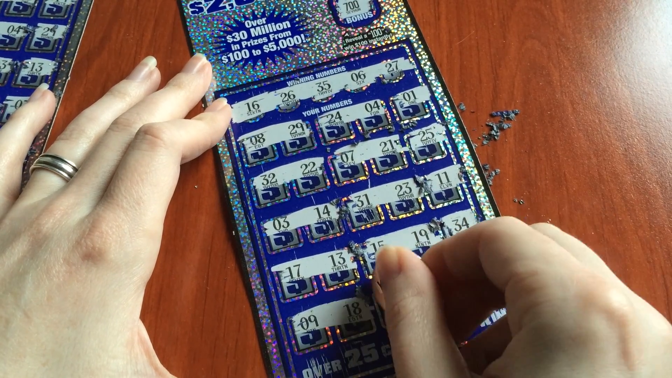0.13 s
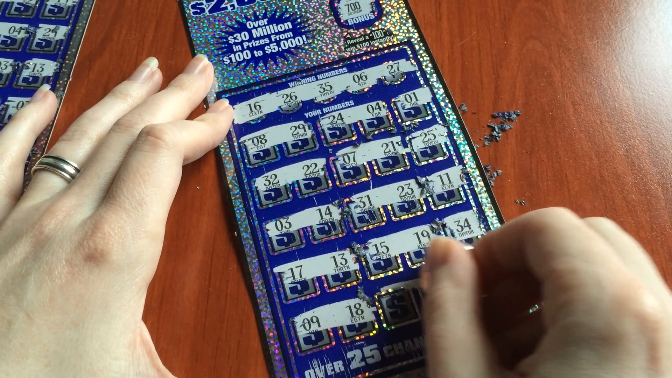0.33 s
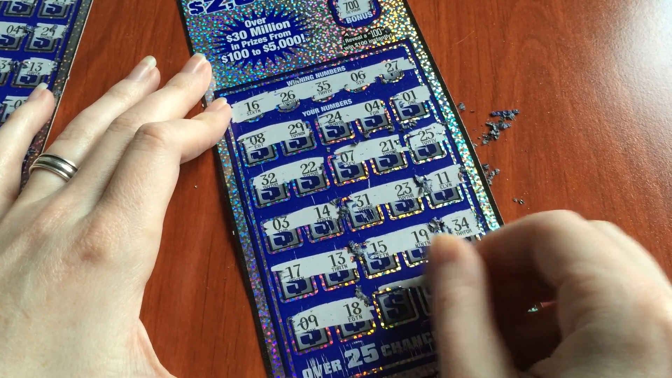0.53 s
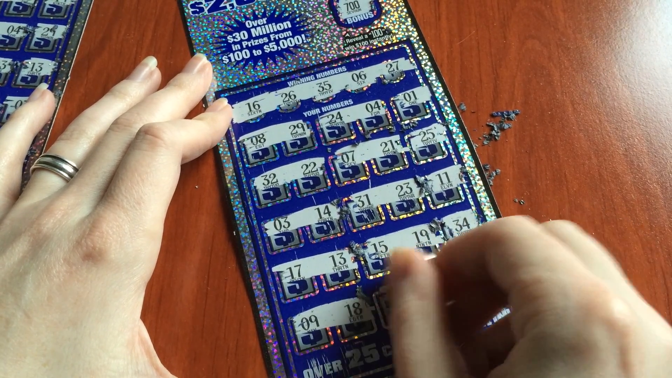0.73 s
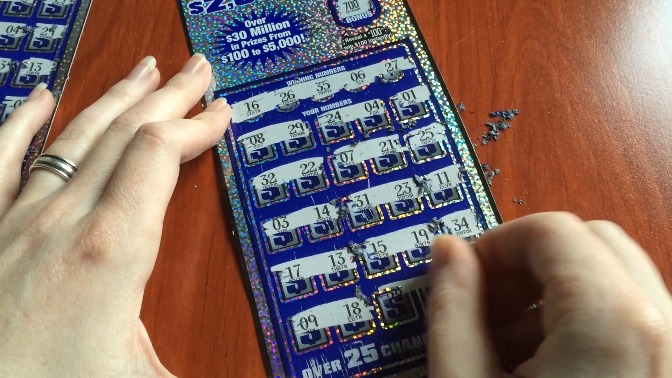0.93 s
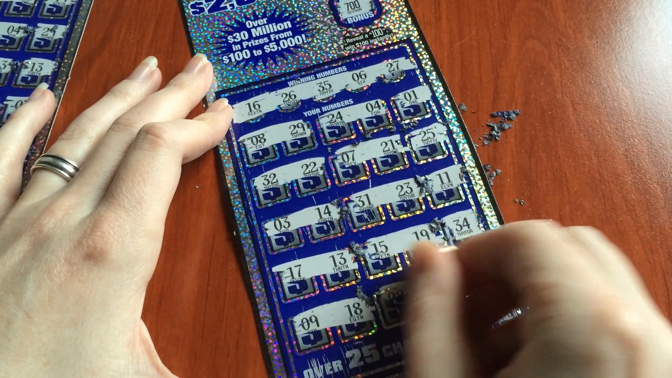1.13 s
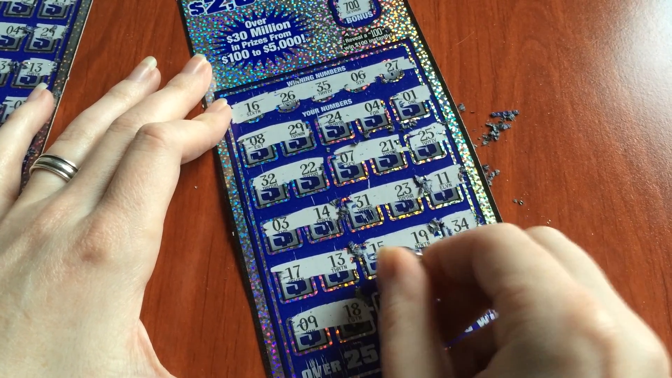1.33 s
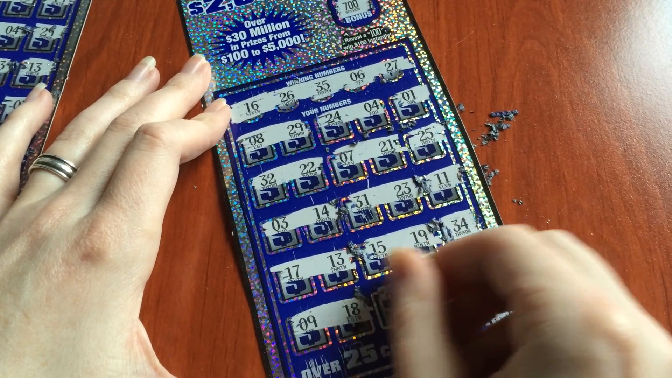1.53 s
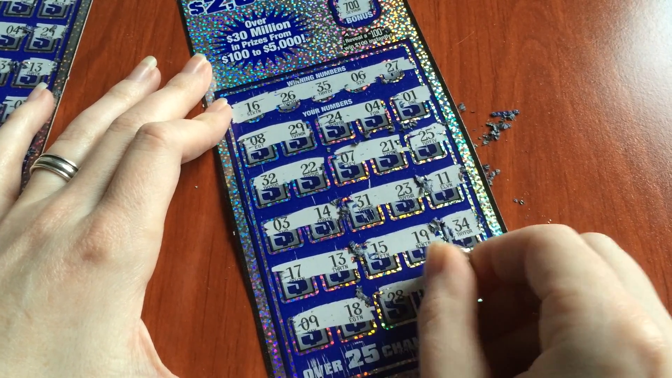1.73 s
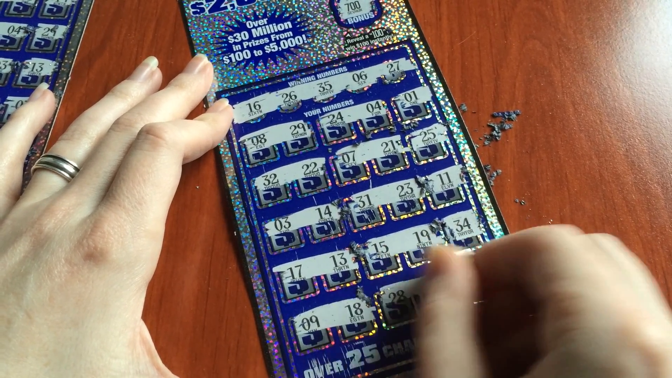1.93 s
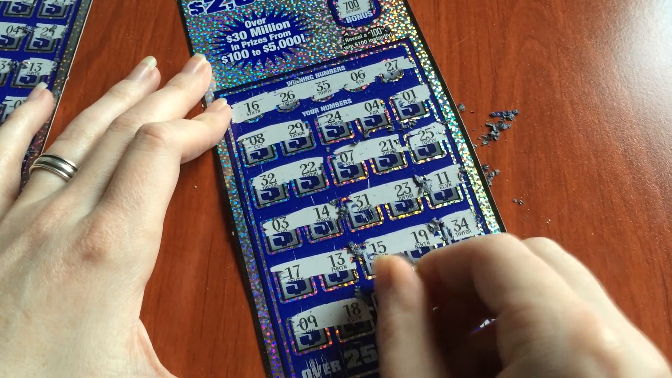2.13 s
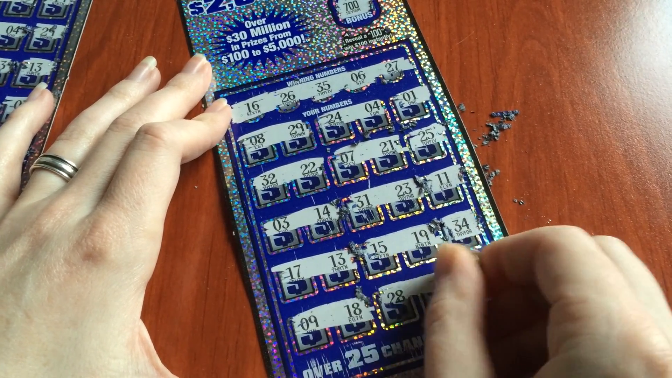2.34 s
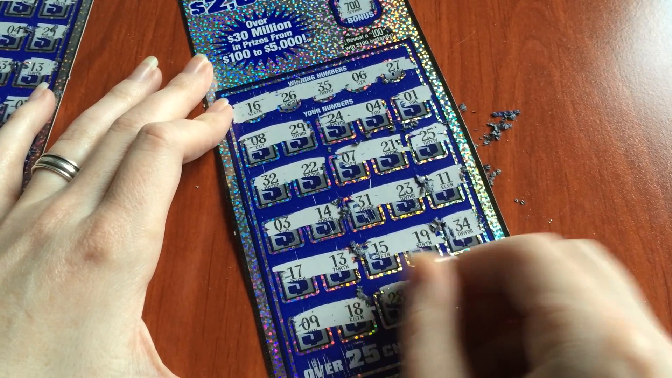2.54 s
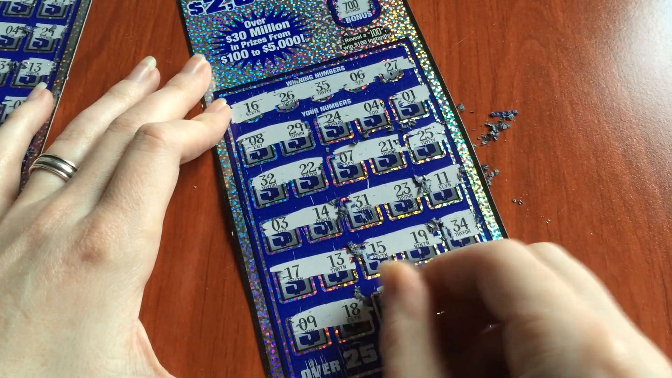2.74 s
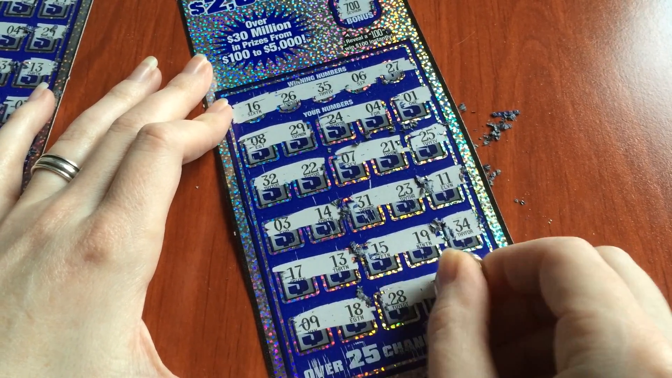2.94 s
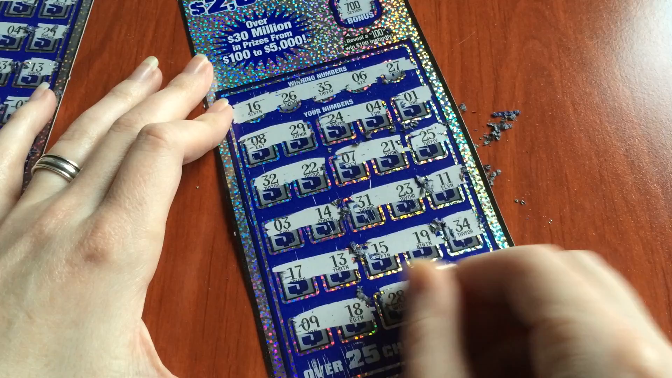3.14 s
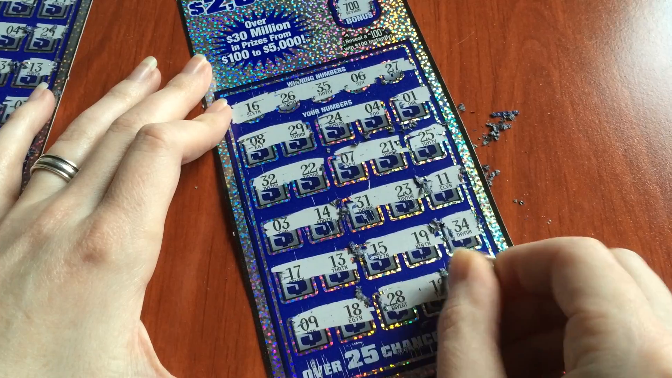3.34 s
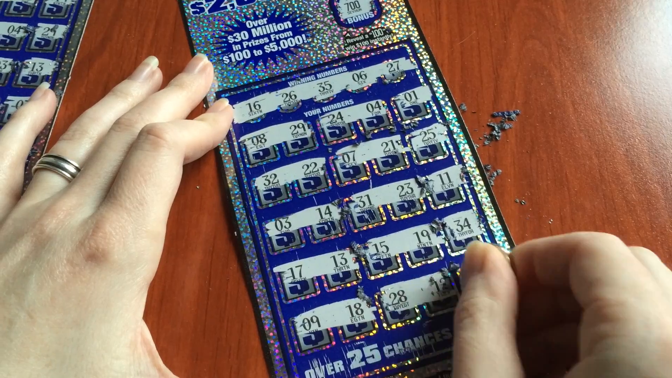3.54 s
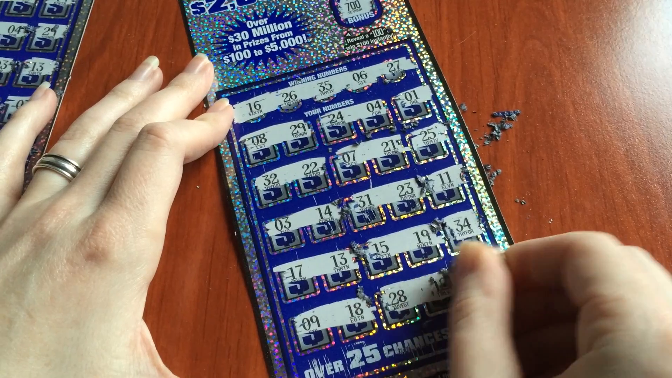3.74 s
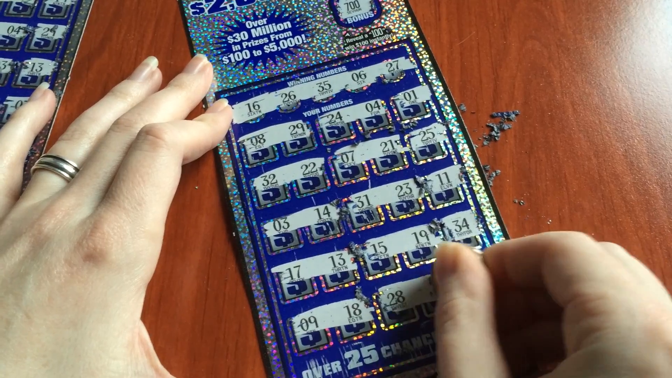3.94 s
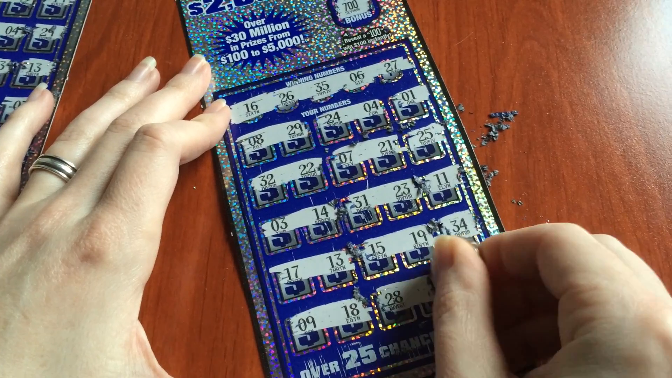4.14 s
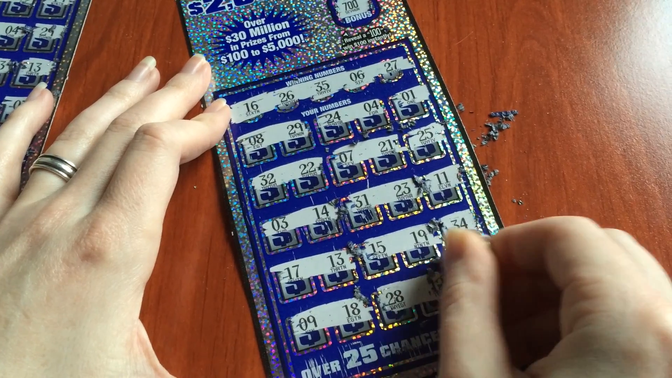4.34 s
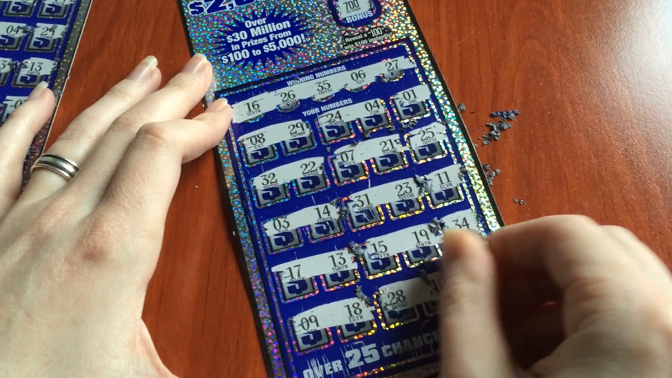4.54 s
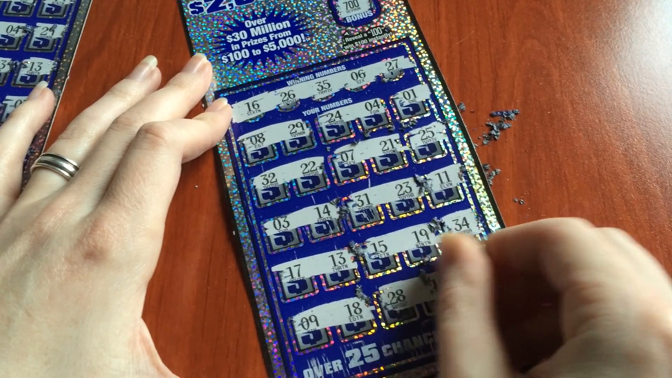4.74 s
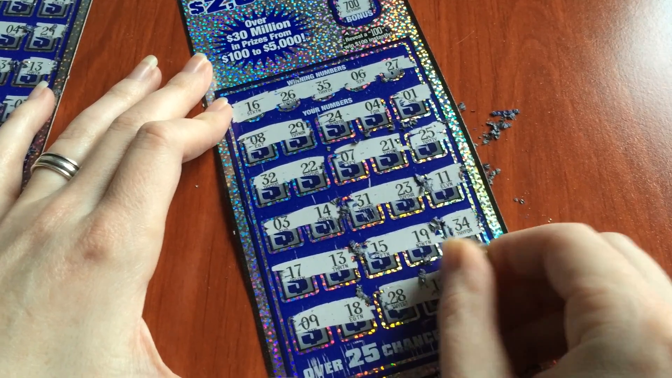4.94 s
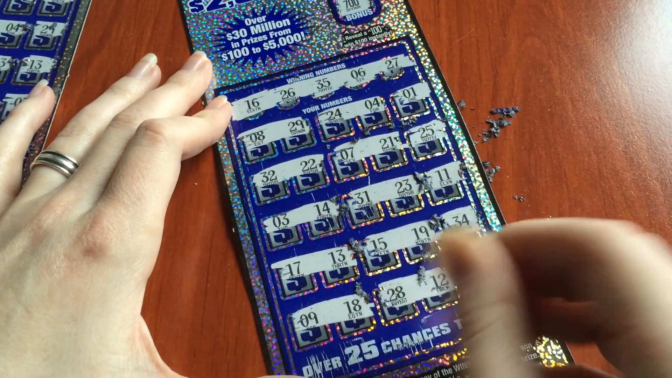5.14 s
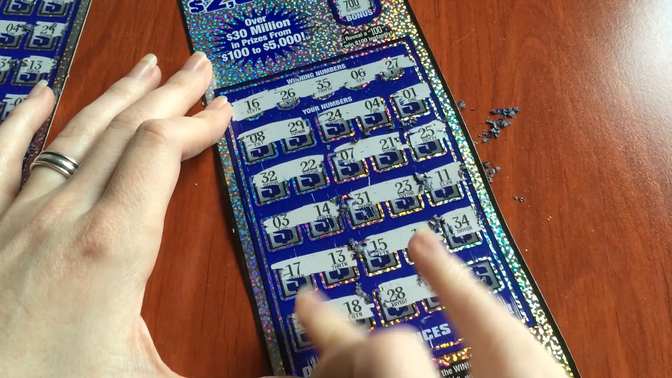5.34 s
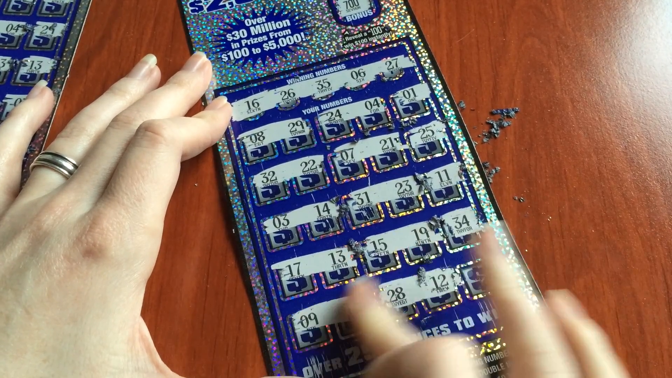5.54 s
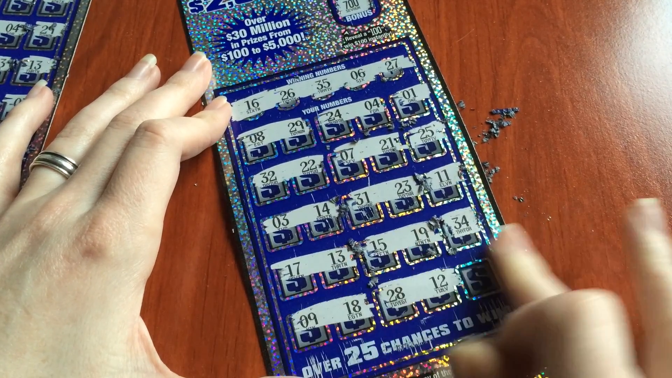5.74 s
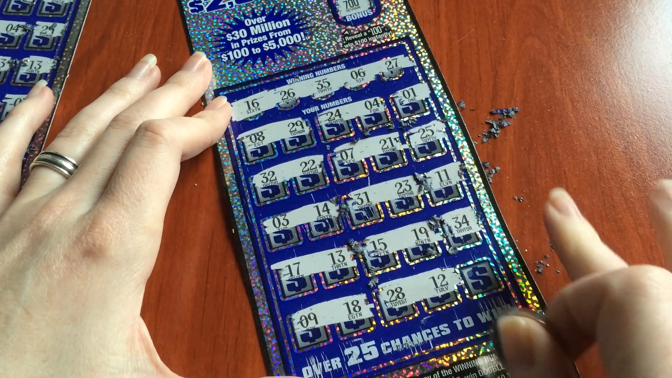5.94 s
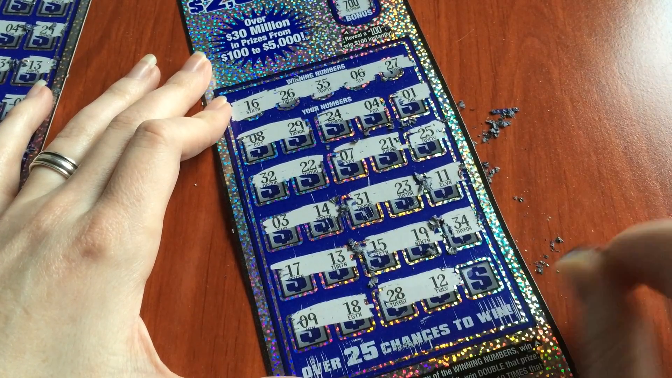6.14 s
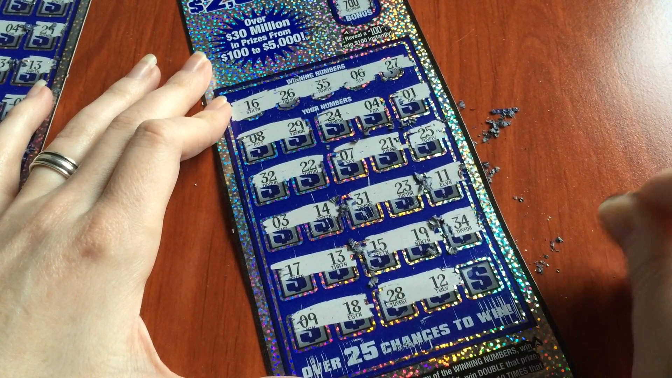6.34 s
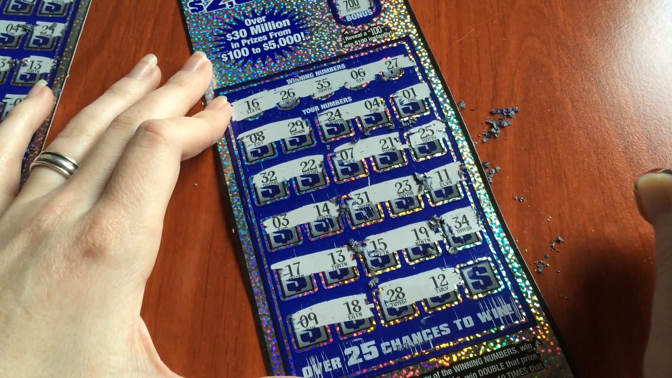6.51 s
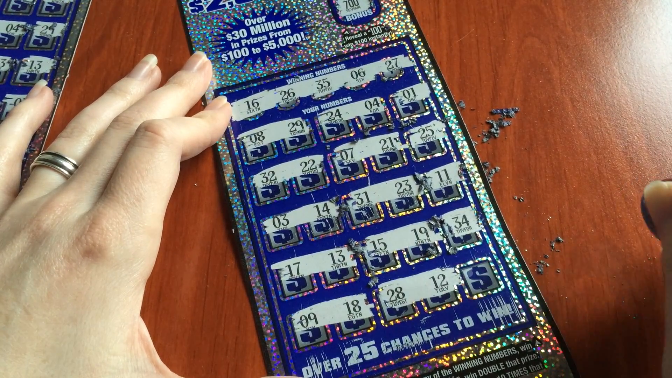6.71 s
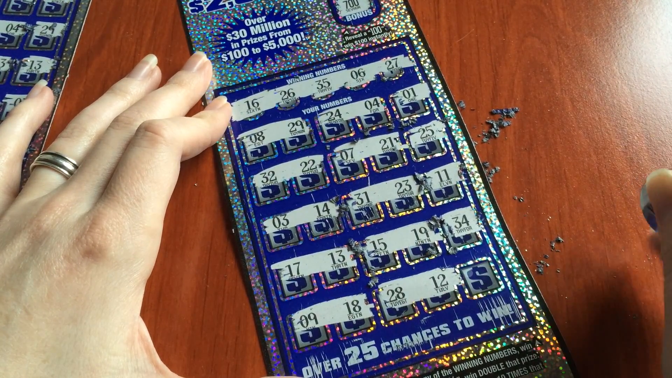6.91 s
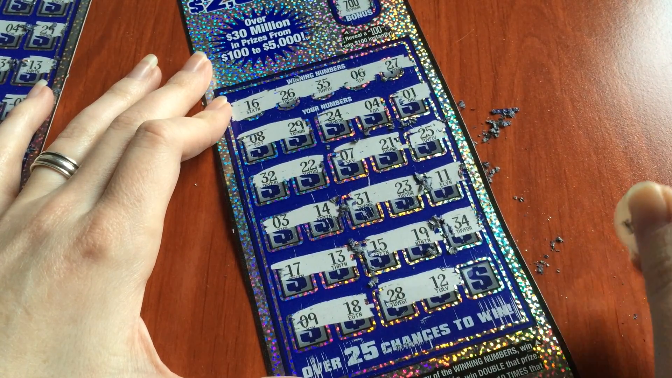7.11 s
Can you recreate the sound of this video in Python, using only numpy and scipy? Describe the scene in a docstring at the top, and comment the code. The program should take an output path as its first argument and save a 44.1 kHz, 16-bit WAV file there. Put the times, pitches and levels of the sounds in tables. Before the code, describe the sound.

Quick, gritty back-and-forth scraping of a coin on a scratch ticket, ending with a faint sweep of fingers in a quiet room.

```python
"""Scratching a card with a coin

A coin scrapes the coating off a card on a wooden table in a quiet room. Stick-slip friction makes each
stroke a dense run of tiny impulses that excite the resonances of card, coin and table top. The coin is
set down twice with a tap; at the end fingers sweep the crumbs away and rub together."""
import sys
import numpy as np
from scipy import signal
from scipy.fft import rfft, irfft, next_fast_len
from scipy.io import wavfile

SR = 44100
rng = np.random.default_rng(int(sys.argv[2]) if len(sys.argv) > 2 else 0)


def pcm_store(signal):
    """Save signal as 16-bit PCM."""
    levels = np.round(np.clip(np.atleast_2d(signal), -1, 1) * 32767)
    wavfile.write(sys.argv[1], SR, levels.astype(np.int16).T)


N = 316197

# exponents of speed, before sharpness: (speeding up, slowing down)
CARD_POWER, TABLE_POWER, GRIT_POWER, JOLT_POWER = (2, 2.73), (1.63, 2.25), (1.32, 3.6), (1, 1)
# Strokes of the coin; the edge bites bite_s before top speed; direction is about 0 pulled, 1 pushed:
# top_speed_s, rise_s, fall_s, rise_sharpness, fall_sharpness, bite_s,
# card_db, table_db, grit_db, jolt_db, direction
COIN_STROKES = [ (0.0, 0.022, 0.037, 1.1, 1.35, 0.018, -53, -51.5, -83, -82, 0.97),
                (0.396, 0.17, 0.14, 1.96, 0.67, .11, -36, -50, -53, -85, 1.02),
                (0.884, 0.1, 0.1, 0.62, 0.89, 0.094, -38.5, -50.5, -43, -75, 0.91),
                (1.101, 0.098, 0.081, 0.67, 1.17, 0.033, -39.5, -49, -44.5, -66, 0.41),
                (1.194, 0.037, 0.095, 0.56, 0.3, 0.044, -50.5, -61.5, -61.5, -83, 0.75),
                (1.386, 0.12, 0.058, 2.02, 1.33, 0.044, -35, -41, -44, -73, 0.21),
                (1.466, 0.047, 0.072, 1.1, 0.37, .03, -53.5, -59.5, -64.5, -72, .6),
                (1.634, 0.078, 0.056, 0.48, 0.53, .06, -49.5, -55.5, -66.5, -67, .2),
                (1.751, 0.061, 0.098, 0.61, 1.5, 0.052, -39.5, -53.5, -43.5, -63.5, 0.72),
                (1.878, 0.066, 0.12, 1.74, 1.17, 0.032, -38.5, -47, -47, -72, 0.23),
                (2.021, 0.07, 0.083, 1, 0.74, 0.055, -38.5, -53, -45.5, -78, 0.8),
                (2.198, 0.065, 0.085, 0.63, 1.4, 0.093, -36.5, -46.5, -63, -73, 0.11),
                (2.313, 0.056, 0.098, 0.79, 0.96, 0.044, -37, -55, -45.5, -71, 0.74),
                (2.484, 0.082, 0.12, 1.23, 1.6, 0.048, -38.5, -47, -44, -66, 0.18),
                (2.645, 0.063, 0.1, 0.69, 1.02, 0.062, -40, -56.5, -45.5, -69, 0.82),
                (2.788, 0.082, 0.089, 1.9, 0.9, 0.037, -37, -42, -41, -60, 0.28),
                (2.948, 0.075, .1, 0.85, 1.16, 0.055, -37, -54.5, -41.5, -61, 0.78),
                (3.117, 0.08, 0.084, 0.74, 1.45, 0.079, -40, -48, -48.5, -62, 0.13),
                (3.248, 0.062, 0.19, 0.92, 1, 0.055, -39, -52.5, -43.5, -64, 0.84),
                (3.462, 0.037, 0.078, 0.5, 0.97, .03, -51.5, -58.5, -71, -67, 0.19),
                (3.597, 0.066, 0.074, .7, 1.54, 0.059, -40.5, -49, -57, -59.5, 0.44),
                (3.692, 0.044, 0.089, 0.99, 1.3, 0.022, -34.5, -41.5, -45.5, -61, -0.068),
                (3.852, 0.071, 0.08, 0.83, 1.75, 0.06, -45, -54, -52.5, -91, 0.57),
                (3.938, 0.05, 0.1, 1.6, 1.62, 0.022, -33.5, -41, -41, -68, 0.16),
                (4.096, 0.066, 0.072, 1.08, 1.6, 0.056, -40.5, -51, -53, -71, 0.68),
                (4.193, 0.061, 0.081, 1.73, 1.57, 0.044, -35.5, -39.5, -46.5, -67, 0.35),
                (4.342, 0.054, 0.071, 1.7, 1.75, 0.04, -33, -49, -45.5, -68.5, 0.65),
                (4.453, 0.068, 0.078, 2, 1.1, 0.036, -41, -49, -50.5, -68, 0.35),
                (4.567, 0.047, 0.058, 1.17, 1.14, 0.024, -44, -55, -53.5, -78, 0.68),
                (4.648, 0.037, 0.069, 1.1, 1.1, 0.058, -42, -49.5, -66, -82, 0.019),
                (4.745, 0.033, 0.078, .8, 0.67, .02, -55.5, -63, -67, -84, 0.54),
                (4.849, 0.047, 0.079, 0.97, 0.75, .03, -48.5, -54, -78, -85, 0.00035),
                (4.955, 0.038, 0.038, 0.43, 0.54, .03, -49.5, -62.5, -61, -71, 0.45),
                (5.044, 0.041, 0.06, 0.4, 0.97, .025, -58.5, -60.5, -72, -80.5, .2), ]


def scrape():
    """Forced vibration: one train of slips drives card, table top, grit and coin."""
    card_db, table_db, grit_db, _, direction = np.transpose(COIN_STROKES)[6:]
    force = slips()
    level = strokes(from_db(card_db), CARD_POWER)
    pushed = strokes(from_db(card_db) * direction, CARD_POWER) / (level + 1e-9)
    drag = force * level
    body = card(drag + snags(), pushed) + wood(force, drag, strokes(from_db(table_db), TABLE_POWER))
    gritty = grit(force) * strokes(from_db(grit_db), GRIT_POWER, from_bite=True) + cracks()
    return body + 0.31 * gritty + coin(gritty, drag, pushed)


def strokes(gains, power, from_bite=False):
    """Friction noise grows as a power of speed: one swell a stroke, from its start or from the bite."""
    s, rise_s, fall_s, sharp_rise, sharp_fall, bite_s = np.transpose(COIN_STROKES)[:6]
    if from_bite:
        return swells(s, bite_s, fall_s, power[0], power[1] * sharp_fall, gains)
    return swells(s, rise_s, fall_s, power[0] * sharp_rise, power[1] * sharp_fall, gains)


def slips(per_s=2500, spread_db=3, clump_db=2.5):
    """Stick-slip friction: the coin's edge gives random impulses of uneven size, in clumps; rms 1."""
    sizes = from_db(spread_db * np.minimum(rng.exponential(1, N), 4)) * rng.choice([-1, 1], N)
    slipping = rng.random(N) < per_s / SR
    return rms_one(slipping * sizes * from_db(clump_db * drift(40)))


# The edge catching, at relative levels: start_s, force_db, crack_db
EDGE_SNAGS = [(0.373, -29, -56), (0.8106, -35, -62), (0.8651, -20, -56), (0.885, -20.5, -45),
              (1.084, -40, -53), (1.175, -40, -53), (1.375, -29, -63), (1.7442, -22.5, -54),
              (1.868, -33, -45), (1.8835, -57, -52), (1.9793, -37.5, -52), (2.014, -22, -43),
              (2.284, -36.5, -59), (2.4713, -31.5, -52), (2.6343, -22.5, -43), (2.6447, -23.5, -49),
              (2.7806, -25, -49), (2.9386, -17, -43.5), (3.238, -21.5, -53), (3.5795, -31, -54),
              (3.601, -45.5, -53), (3.684, -16.5, -45), (3.909, -53, -58), (3.9351, -18.5, -42),
              (4.1653, -54, -58), (4.1898, -40, -56), (4.3207, -28, -53), (4.432, -36, -53),
              (4.6388, -38, -51.5)]


def snags():
    """Sudden release: the edge breaks free with a burst of force in a slow and a fast decay."""
    s, db, _ = np.transpose(EDGE_SNAGS)
    return bursts(s, db - 7, t60=0.046) + bursts(s, db - 4.5, t60=0.008)


def cracks():
    """Transient radiation: each snag sends a bright crack into the air."""
    s, _, db = np.transpose(EDGE_SNAGS)
    return high_passed(bursts(s, db + 3.5, t60=0.0217), 3300)


# Resonances of the card under the coin: pitch_hz, width_hz, pulled_db, pushed_db
CARD_MODES = [(677, 43, -28, -21.5), (842, 230, -4, -19.5), (922, 79, 5.5, -13.5), (1085, 110, 4.5, -11.5),
              (1212, 29, 4.5, -6), (1271, 27, -5, -6), (1455, 79, 2, 1.5), (1632, 72, -8.5, 0),
              (1734, 17, -5, -2), (1810, 46, -27.5, -5.5), (2081, 46, -14.5, -2), (2237, 36, -20.5, -5.5),
              (2444, 89, -16.5, -4.5), (2680, 57, -17, -13), (2812, 100, -22, -8.5),
              (3160, 89, -31.5, -11.5), (3390, 160, -46.5, -18), (3833, 73, -20, -26.5)]


def card(force, pushed):
    """Resonance: the card filters the force; dividing out the power gain evens pulls and pushes."""
    power_gain = sum(np.pi * width / SR * from_db(2 * (pull + (push - pull) * pushed))
                     for _, width, pull, push in CARD_MODES)
    return stroked(force / np.sqrt(power_gain), CARD_MODES, pushed)


# Modes of the wooden top, lowest first: pitch_hz, level_db, t60_s
TABLE_MODES = [(197.6, -15.5, 0.37), (256, -31, 0.15), (372.7, -13, 0.2), (457.5, -2.5, 0.14),
               (571.3, -1.5, 0.069), (643, -11, 0.11), (870, -24.5, 0.15), (987, -28.5, 0.17),
               (1050, -29, 0.14), (1169, -4.5, 0.088), (1405, -9, 0.13), (1560, -22.5, 0.092),
               (1567, -14, 0.11), (1615, -30, 0.15), (1860, -19.5, 0.09), (2153, -22.5, 0.056),
               (2250, -22.5, 0.11), (2300, -25, 0.12), (2900, -19.5, 0.046)]


def table(force):
    """Modal superposition: the top rings as a sum of damped modes; slow bending radiates poorly."""
    rings = sum(from_db(db) * ring(force, hz, t60) for hz, db, t60 in TABLE_MODES)
    return high_passed(rings, 170, order=4)


def wood(force, drag, level):
    """Transmission through a soft layer: the card cushions the force that reaches the table top."""
    cushioned = low_passed(force, 930)
    pressed = cushioned * level
    rings = 0.78 * table(pressed) / np.std(table(cushioned))
    thud = 3.9 * resonate(pressed, hz=595, width=230)   # dead sound under the hand
    lowest_hz, _, lowest_t60 = TABLE_MODES[0]
    rocking = from_db(-45) * ring(drag, lowest_hz, lowest_t60)   # sideways drag rocks the whole top
    return rings + thud + rocking


# Spectrum of the grit: frequency_hz, relative_density_db
GRIT_SPECTRUM = [(2000, -40.5), (3000, -4), (4500, -5.5), (6200, -8.5), (10000, -17.5), (12000, -15.5),
                 (15500, -17)]


def grit(force, clump_db=2.5):
    """Direct radiation: slips and fine noise reach the air as a bright hiss in fast clumps."""
    fine = 2.4 * force + rng.standard_normal(N)
    return coloured(fine, GRIT_SPECTRUM) * from_db(clump_db * drift(140))


# Bright resonances of the coin: pitch_hz, width_hz, pulled_db, pushed_db
COIN_MODES = [(3930, 107, -6, -12), (4473, 140, 7.5, 1), (5090, 205, -31, -4.5), (7060, 500, 5, -7),
              (7300, 270, 3, -4.5), (7870, 310, -4, -1), (11300, 220, -8.5, -12.5), (13700, 300, -7, -21)]


def coin(gritty, drag, pushed, drag_db=-35):
    """Broadband excitation: grit rings the coin, and so, faintly, does the drag all through a stroke."""
    return stroked(gritty + from_db(drag_db) * drag, COIN_MODES, pushed)


# The coin set down on the card: start_s, blow_db, tick_db, contact_cutoff_hz
COIN_TAPS = [(0.1919, -30.5, -46.5, 1890), (0.7197, -34.5, -44, 1230)]


def taps(bass_cut_hz=270):
    """Impact: a tick of first contact, then a soft blow that rings the top and its many small modes."""
    out = 0
    for s, db, tick_db, contact_hz in COIN_TAPS:
        blow = np.zeros(N)
        blow[round((s + .002) * SR)] = from_db(db)
        rattle = resonate(bursts([s + 0.0023], [db + 15.5], t60=0.074), hz=1370, width=800)
        knock = low_passed(table(blow) + rattle, contact_hz)
        out = out + low_passed(knock, 1500) + tick(s, tick_db, hz=5000, t60=0.017)
    return high_passed(out, bass_cut_hz)   # the taps carry little deep bass


# Fingers crossing the card: time_s, hiss_db, table_db, skin_drag_db
FINGER_SWEEP = [(5.5, -78.5, -82, -97), (5.618, -59, -93, -79), (5.649, -53, -58.5, -62.5),
                (5.68, -61.5, -83, -72), (5.706, -60, -99, -77), (5.788, -52.5, -91, -65.5),
                (5.838, -57.5, -94, -74), (5.876, -68.5, -81, -69), (5.92, -99, -92, -103)]
# Spectrum of their hiss: frequency_hz, relative_density_db
HISS_SPECTRUM = [(2500, -17), (3600, -5.5), (4400, -3.5), (6500, -4.5), (7500, -3.5), (11000, -4.5),
                 (15500, -6.5)]
# Resonances of the card under the cupped fingers: pitch_hz, width_hz, level_db
CUPPED_MODES = [(4420, 440, 1.5), (5150, 180, -5.5), (5730, 170, 3), (6300, 210, 2), (8700, 820, -8),
                (10800, 670, -12), (13900, 610, -6)]


def sweep(flutter):
    """Sliding friction: skin hisses on the card and rings it, and its pressure reaches the wood."""
    silent = (-200, -200, -200)
    curve = [(FINGER_SWEEP[0][0] - .01, *silent), *FINGER_SWEEP, (FINGER_SWEEP[-1][0] + .01, *silent)]
    hiss_level, table_level, drag_level = from_db(in_time(curve))
    hiss = noise(HISS_SPECTRUM) * hiss_level
    rings = sum(from_db(db + 1.3 * drift(6.9)) * resonate(hiss, hz, width)
                for hz, width, db in CUPPED_MODES)
    drag = noise([(900, -14), (1500, -4), (2900, 1.5), (4000, -19)]) * drag_level
    press = rng.standard_normal(N)
    bump = table(press * table_level) / np.std(table(press))
    return (0.84 * hiss + rings + drag) * flutter + bump


# Fingertips rubbing together: top_speed_s, rise_s, fall_s, level_db
FINGER_RUBS = [(5.254, .07, .07, -64.5), (6.082, 0.047, .05, -75), (6.38, 0.034, .04, -66.5),
               (6.47, .07, 0.044, -69), (6.624, .08, 0.037, -64.5), (6.726, .035, .055, -66),
               (6.838, .035, 0.13, -66.5), (7.12, .06, .035, -71)]
# Spectrum of skin on skin: frequency_hz, relative_density_db
RUB_SPECTRUM = [(3000, -12.5), (6000, -8.5), (10000, -4), (14000, 1.5), (16000, -3)]


def rubs(rise_power=1.4, fall_power=1.8):
    """Dry friction: the fingertips give a thin hiss that grows with their speed."""
    s, rise_s, fall_s, db = np.transpose(FINGER_RUBS)
    return noise(RUB_SPECTRUM) * swells(s, rise_s, fall_s, rise_power, fall_power, from_db(db))


# Small contacts of nail or crumb: start_s, burst_db, pitch_hz
CRUMB_TICKS = [(5.1427, -50, 6140), (5.17, -58, 5500), (5.472, -56, 9700), (5.7196, -54, 4580),
               (5.8795, -49, 6040), (7.061, -58, 1580)]


def crumbs():
    """Light impacts: a nail or crumb gives a dry, heavily damped tick."""
    return sum(tick(s, db, hz, t60=0.014) for s, db, hz in CRUMB_TICKS)


# Continuous rumble through the table: time_s, level_db
TABLE_RUMBLE = [(0.0, -74), (1.0, -82), (2.0, -73.5), (3.0, -82), (4.0, -78), (5.1, -86), (5.63, -73),
                (6.93, -75), (7.17, -73.5)]


def rumble():
    """Structure-borne sound: a low rumble that swells as each stroke jolts the table."""
    low = noise([(15, -52.5), (45, -3.5), (110, -4.5), (170, -3.5), (300, -39)])
    jolt_db = np.transpose(COIN_STROKES)[9]
    return low * (from_db(in_time(TABLE_RUMBLE)[0]) + strokes(from_db(jolt_db), JOLT_POWER))


# Spectrum of the quiet room: frequency_hz, relative_density_db
ROOM_SPECTRUM = [(20, -19), (60, -9), (150, -0.5), (300, -4.5), (500, -8), (1000, -14.5), (2500, -18.5),
                 (6000, -21), (10000, -23.5), (15500, -25)]


def room(level_db=-70.5):
    """Ambient noise: a steady hush, strongest in the bass."""
    return from_db(level_db) * noise(ROOM_SPECTRUM)


def stroked(force, modes, pushed, wander_db=2):
    """Parallel resonances of alternating sign; each swells and fades as the point of contact moves."""
    out = 0
    for k, (hz, width, pull_db, push_db) in enumerate(modes):
        db = pull_db + (push_db - pull_db) * pushed + wander_db * drift(5.9)
        out = out + (-1) ** k * resonate(force * from_db(db), hz, width)
    return out


def swells(s, rise_s, fall_s, rise_power, fall_power, gains):
    """Uniform acceleration, then deceleration: gain x speed ** power, summed over all motions."""
    t = np.arange(0, N + 32, 32)[:, None] / SR
    rising = np.clip(1 - (s - t) / rise_s, 0, 1) ** rise_power
    falling = np.clip(1 - (t - s) / fall_s, 0, 1) ** fall_power
    return np.interp(np.arange(N) / SR, t[:, 0], np.where(t < s, rising, falling) @ gains)


def tick(s, db, hz, t60):
    """A transient: one short burst of noise in a broad band around hz."""
    return resonate(bursts([s], [db], t60), hz, width=hz * 1.34)


def bursts(times, levels_db, t60):
    """Exponential decay: noise that starts at once at each time and dies away."""
    clicks = np.zeros(N)
    clicks[np.round(np.array(times) * SR).astype(int)] = from_db(levels_db)
    envelope = signal.lfilter([1], [1, -from_db(-60 / (t60 * SR))], clicks + 1e-18)
    return rng.standard_normal(N) * envelope


def ring(force, hz, t60):
    """Damped oscillator: a unit impulse starts a sine of height 1."""
    r, w = from_db(-60 / (t60 * SR)), 2 * np.pi * hz / SR
    return signal.lfilter([0, np.sin(w)], [1, -2 * r * np.cos(w), r * r], force + 1e-18)


def resonate(force, hz, width):
    """Band-pass resonance with gain 1 at its peak."""
    r, w = np.exp(-np.pi * width / SR), 2 * np.pi * hz / SR
    feed = np.array([1, 0, -1]) * (1 - r * r) / 2
    return signal.lfilter(feed, [1, -2 * r * np.cos(w), r * r], force + 1e-18)


def drift(hz):
    """Random modulation: white noise twice through a one-pole low-pass, held for 8 samples; rms 1."""
    r = np.exp(-16 * np.pi * hz / SR)
    smooth = signal.lfilter([1], [1, -2 * r, r * r], rng.standard_normal(N // 8 + 5001))[5000:]
    return np.repeat(rms_one(smooth), 8)[:N]


def coloured(x, spectrum):
    """Spectral shaping by (frequency_hz, gain_db) points; rms 1."""
    size = next_fast_len(N)
    hz = np.maximum(np.arange(size // 2 + 1) * SR / size, 1)
    point_hz, point_db = np.transpose(spectrum)
    gain = from_db(np.interp(np.log(hz), np.log(point_hz), point_db))
    return rms_one(irfft(rfft(x, size) * gain, size)[:N])


def noise(spectrum):
    return coloured(rng.standard_normal(N), spectrum)


def low_passed(x, hz):
    return signal.sosfilt(signal.butter(2, hz, fs=SR, output="sos"), x)


def high_passed(x, hz, order=2):
    return signal.sosfilt(signal.butter(order, hz, "high", fs=SR, output="sos"), x)


def in_time(rows):
    """Linear interpolation of each column, one value a sample."""
    s, *columns = np.transpose(rows)
    return [np.interp(np.arange(N) / SR, s, c) for c in columns]


def from_db(db):
    return 10 ** (np.asarray(db) / 20)


def rms_one(x):
    return x / np.sqrt(np.mean(x ** 2) + 1e-20)


def scene():
    """Superposition: coin, fingers and background add in one channel."""
    hush = room()
    coin_work = scrape() + taps()
    flutter = from_db(1.1 * drift(120))   # grainy texture of sliding skin
    fingers = sweep(flutter) + rubs() * flutter + crumbs()
    return (coin_work + fingers + rumble() + hush)[None]


def record(dry):
    """Band limiting: a steep low-pass removes the highest treble."""
    cutoff_hz = 15350
    return signal.sosfilt(signal.ellip(12, .5, 70, cutoff_hz, fs=SR, output="sos"), dry)


dry = scene()
out = record(dry)
pcm_store(out)
```